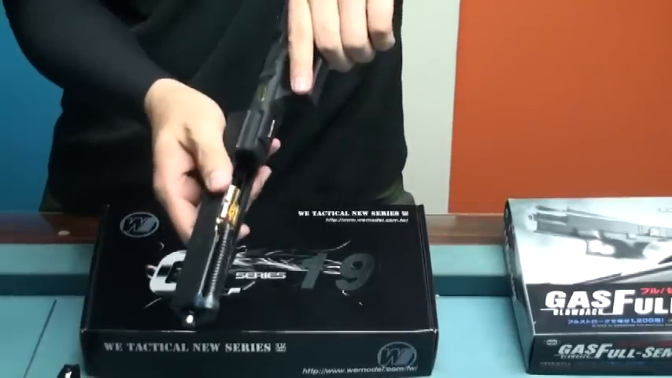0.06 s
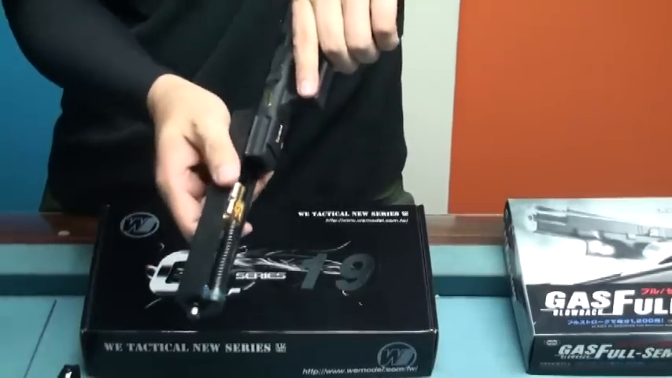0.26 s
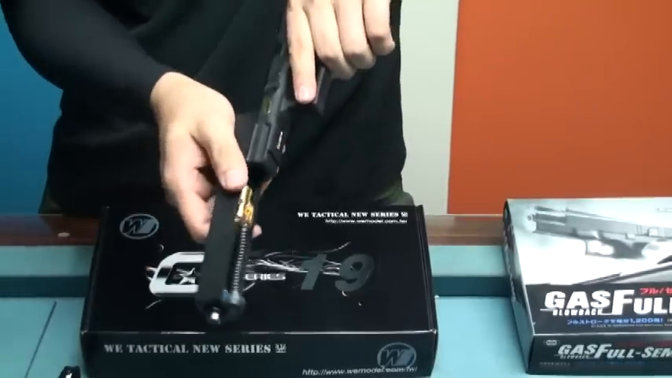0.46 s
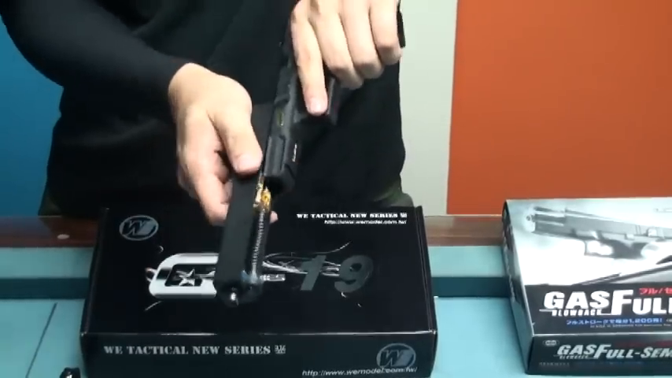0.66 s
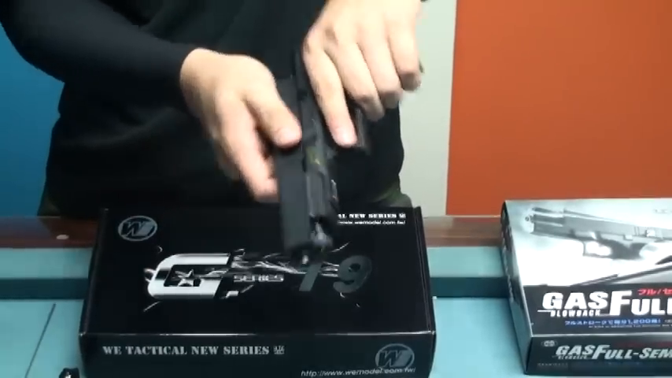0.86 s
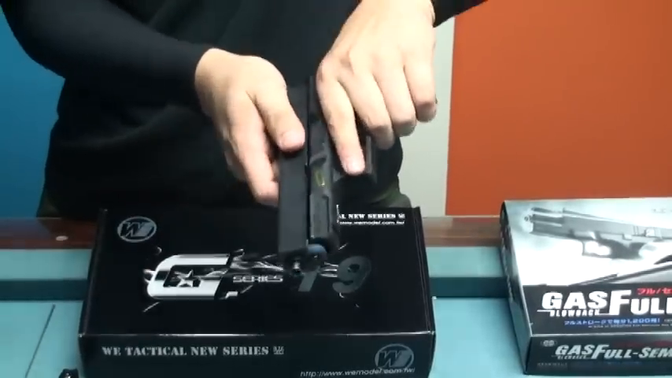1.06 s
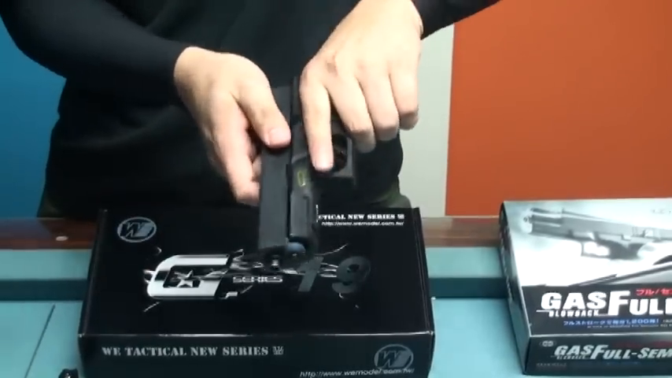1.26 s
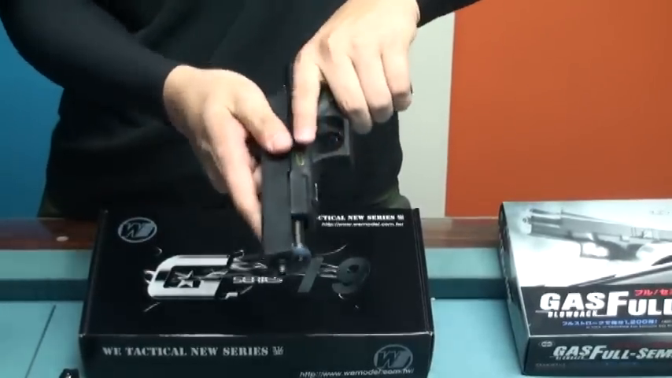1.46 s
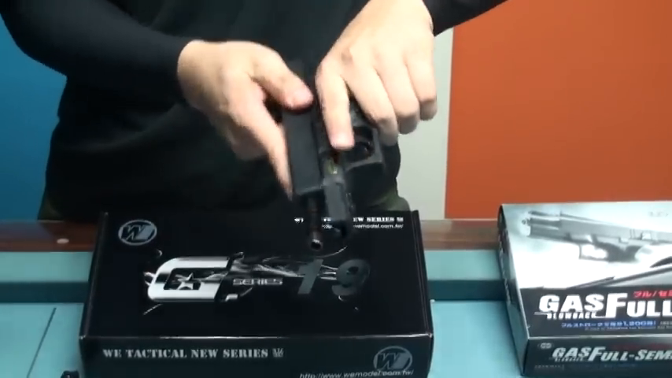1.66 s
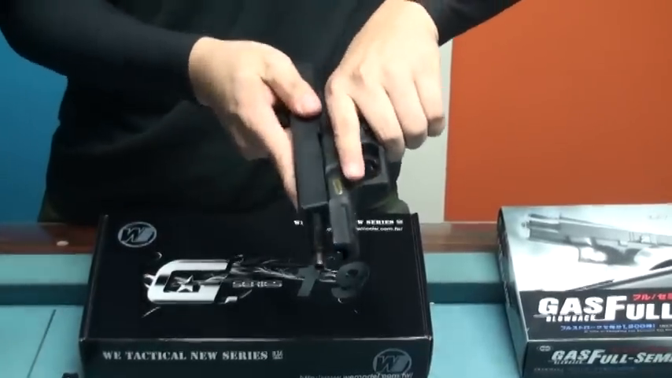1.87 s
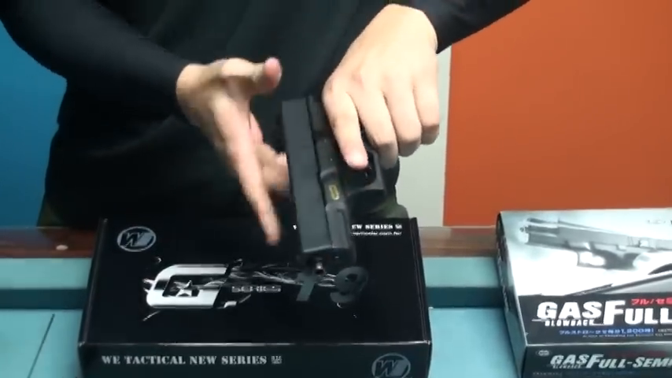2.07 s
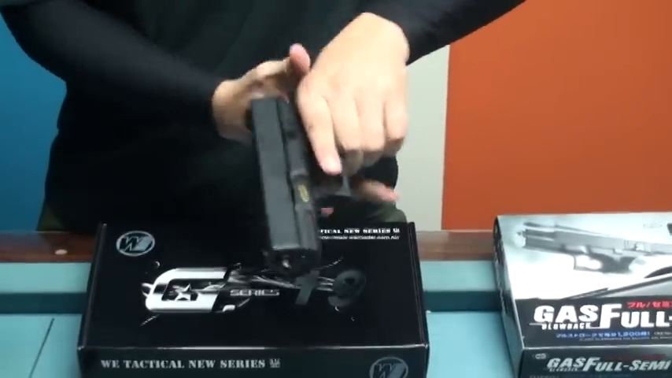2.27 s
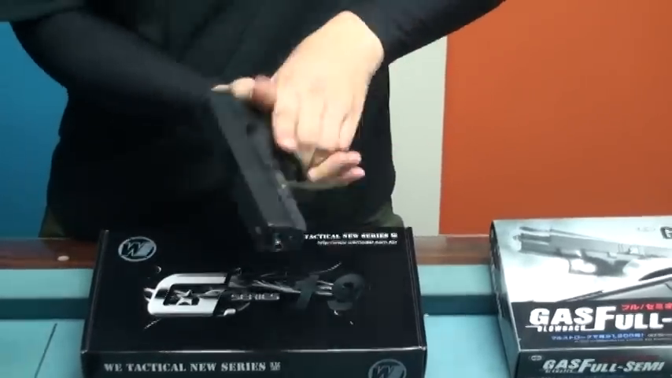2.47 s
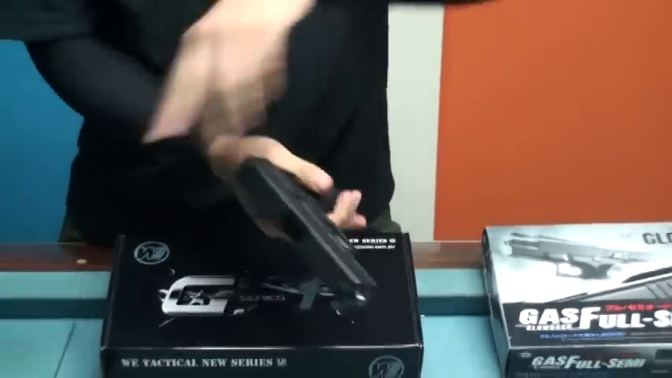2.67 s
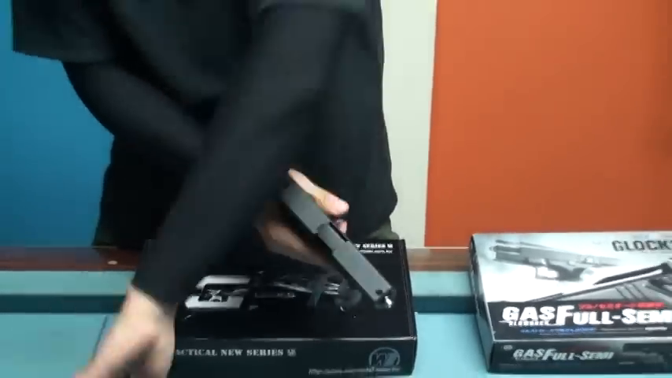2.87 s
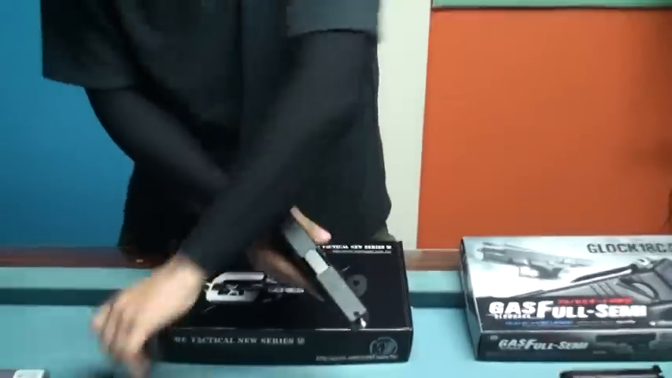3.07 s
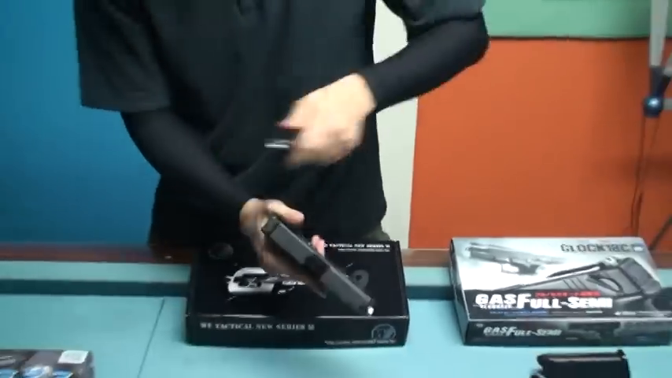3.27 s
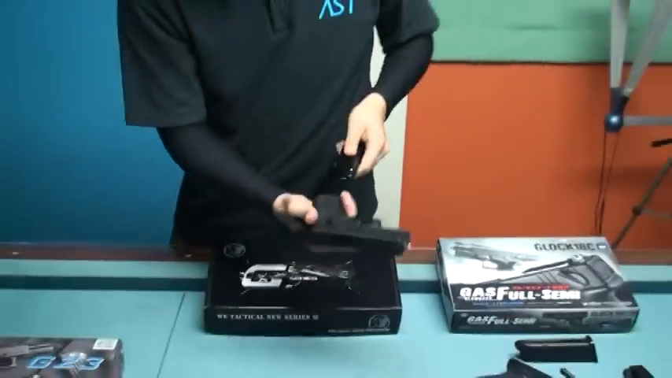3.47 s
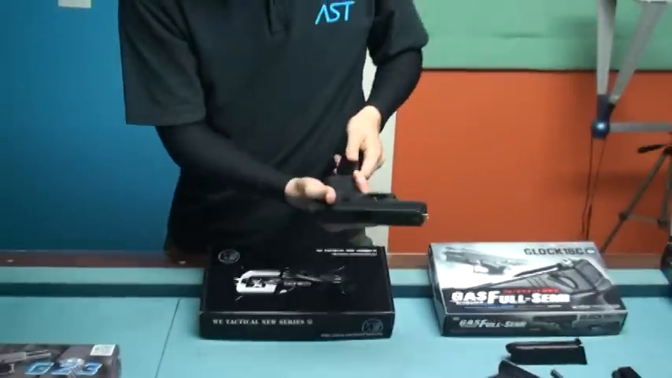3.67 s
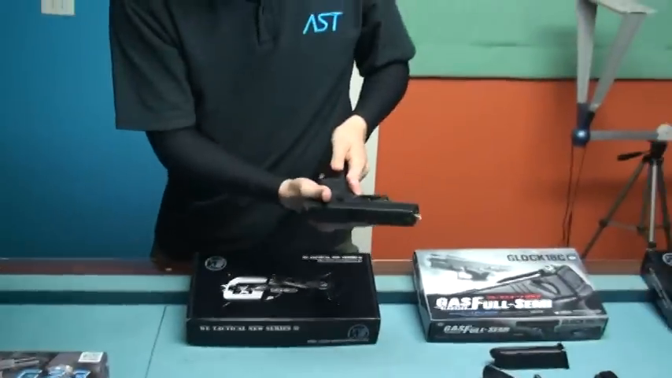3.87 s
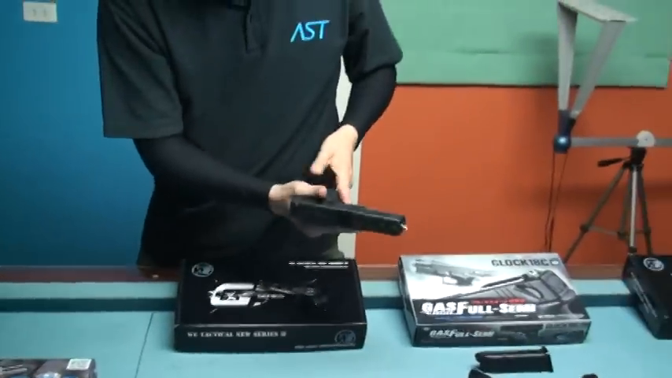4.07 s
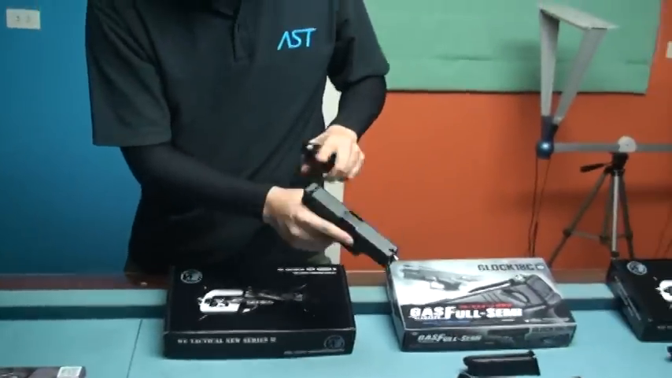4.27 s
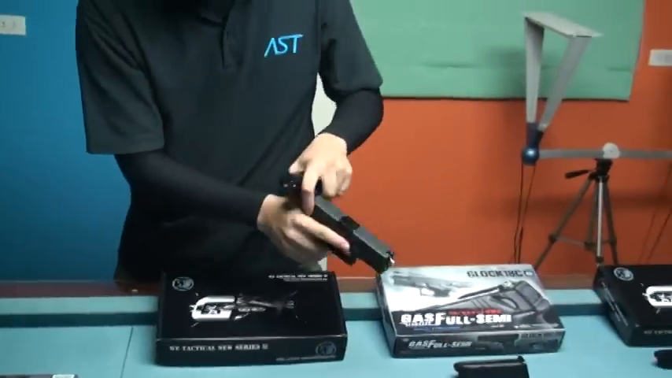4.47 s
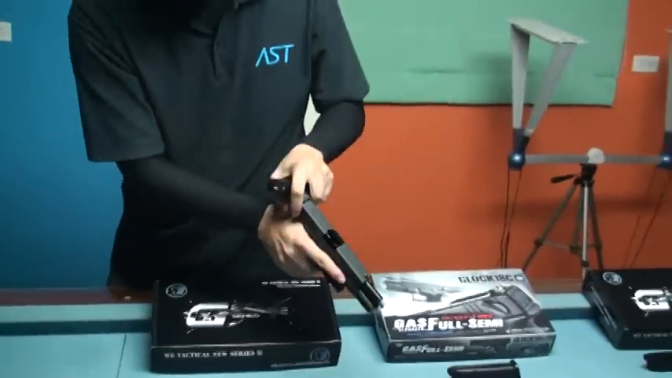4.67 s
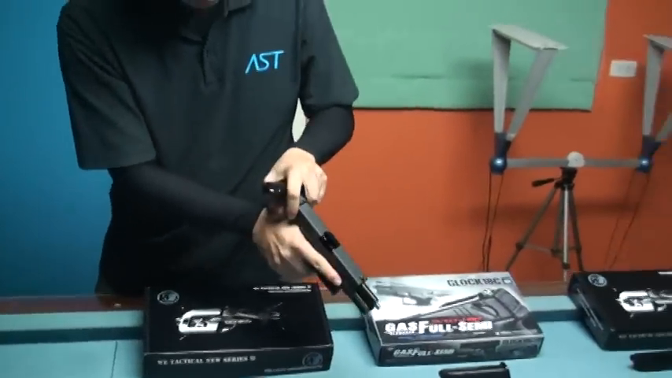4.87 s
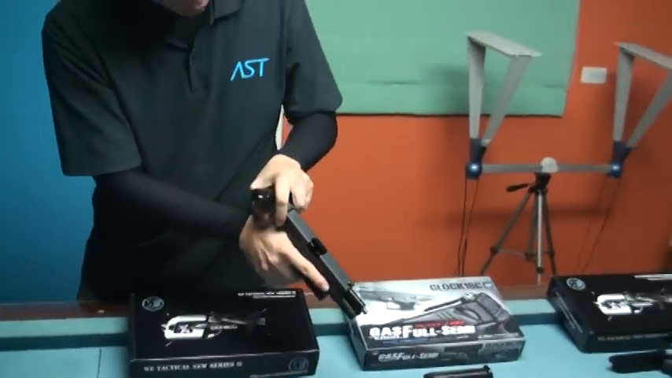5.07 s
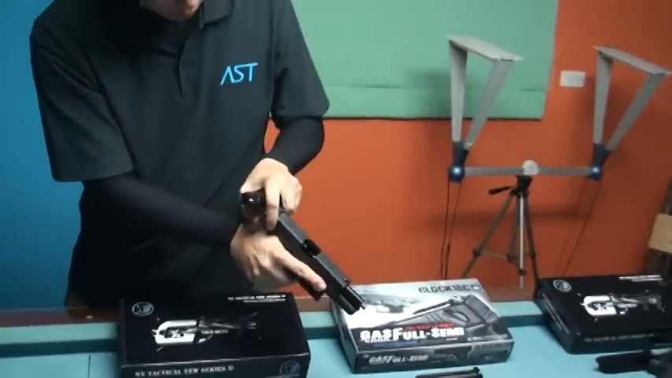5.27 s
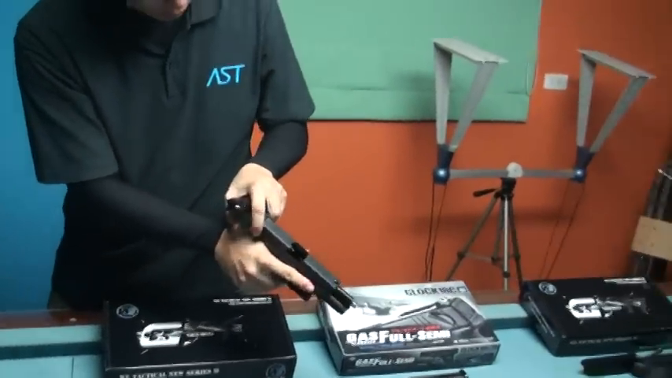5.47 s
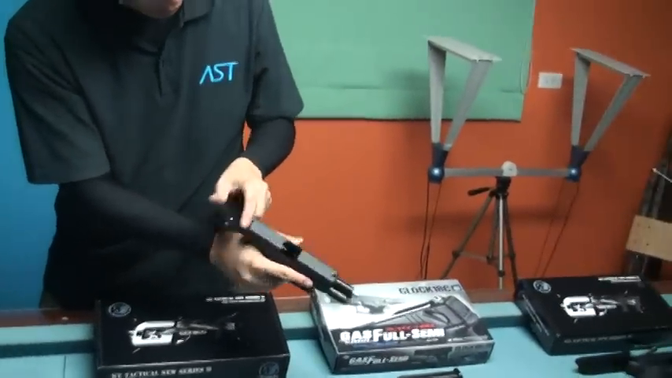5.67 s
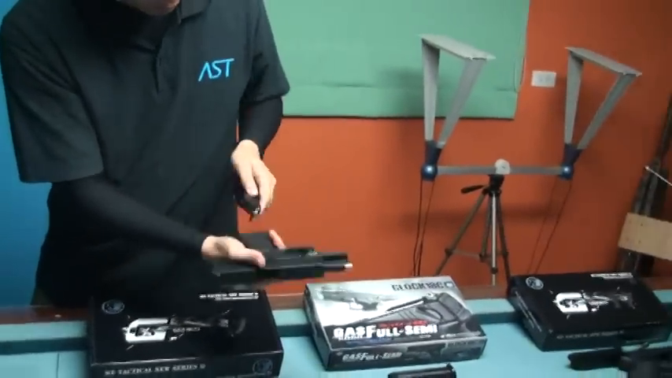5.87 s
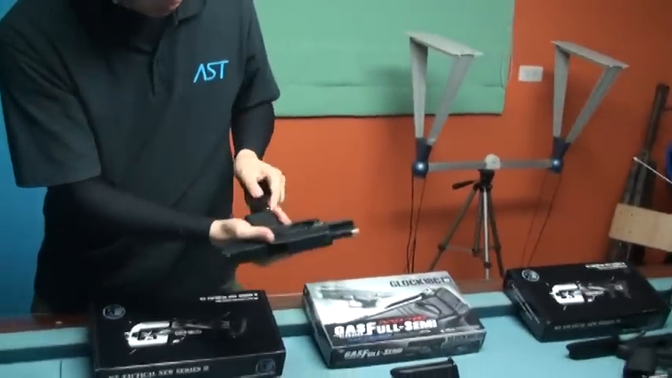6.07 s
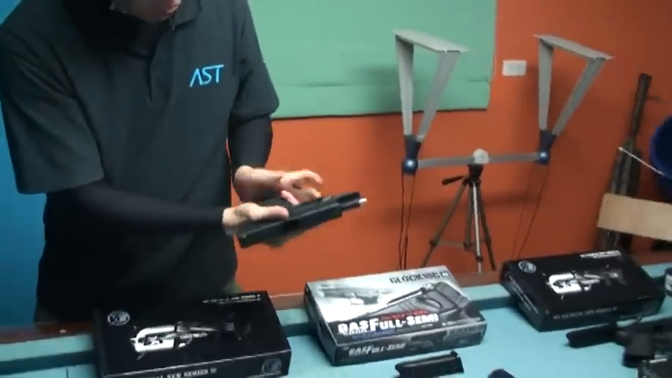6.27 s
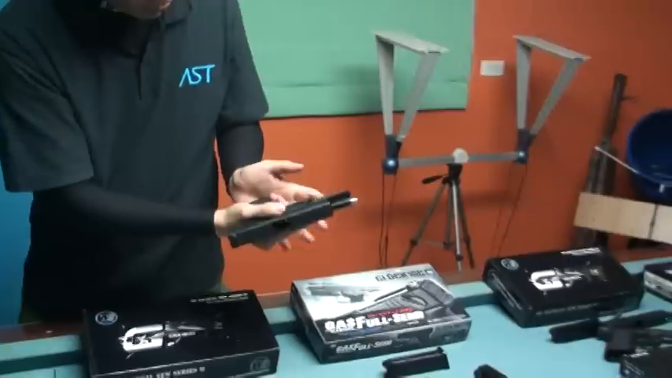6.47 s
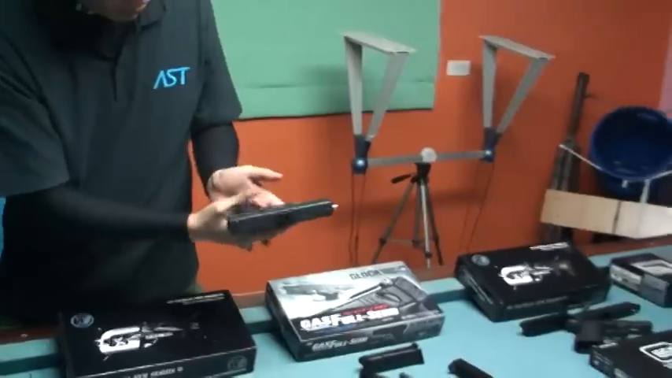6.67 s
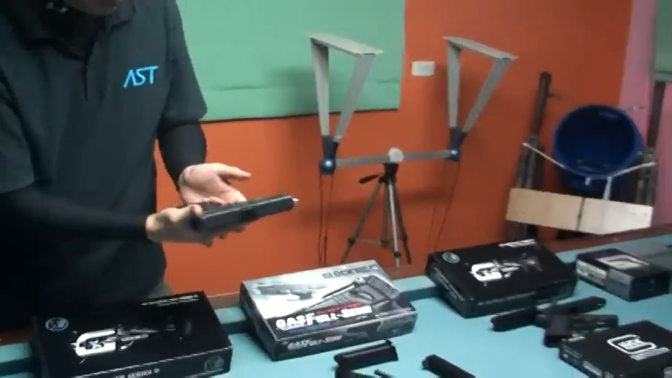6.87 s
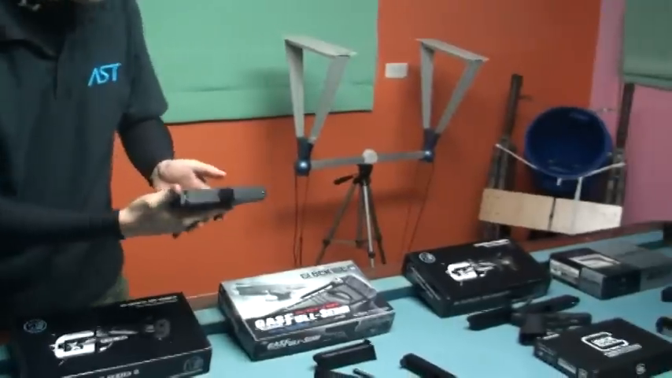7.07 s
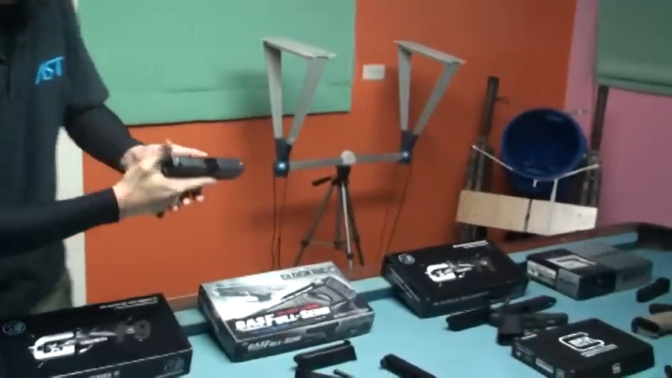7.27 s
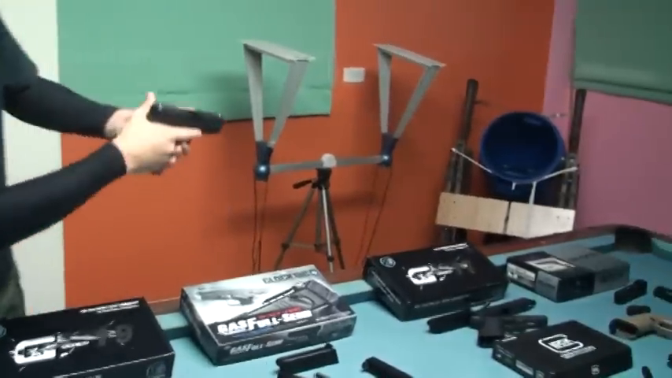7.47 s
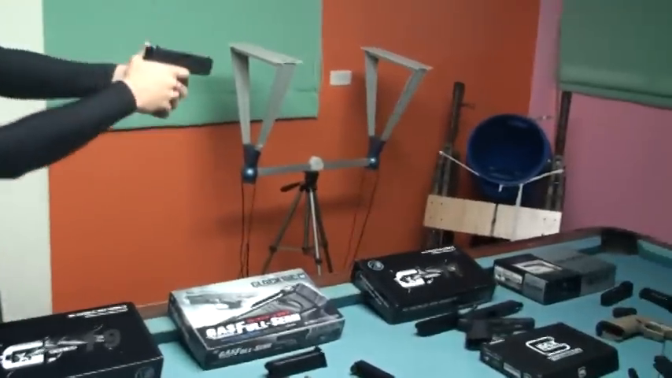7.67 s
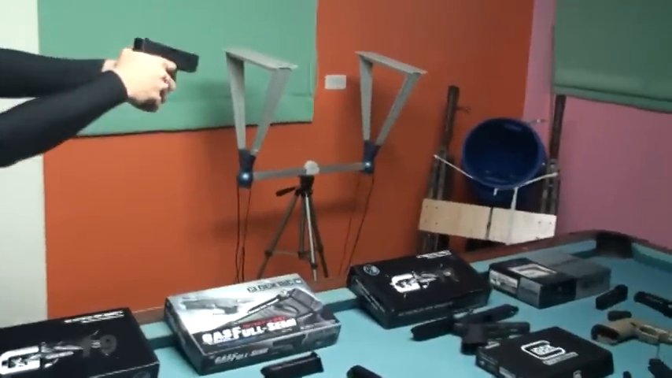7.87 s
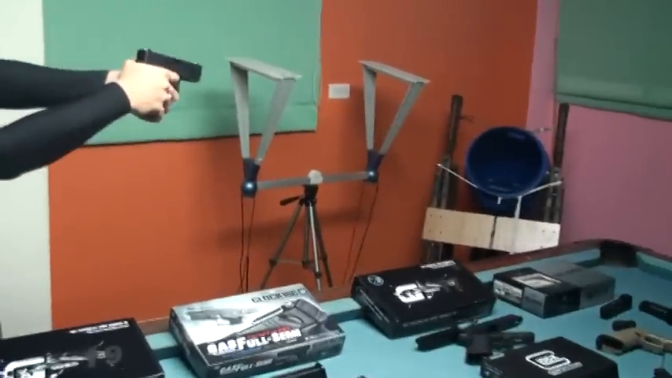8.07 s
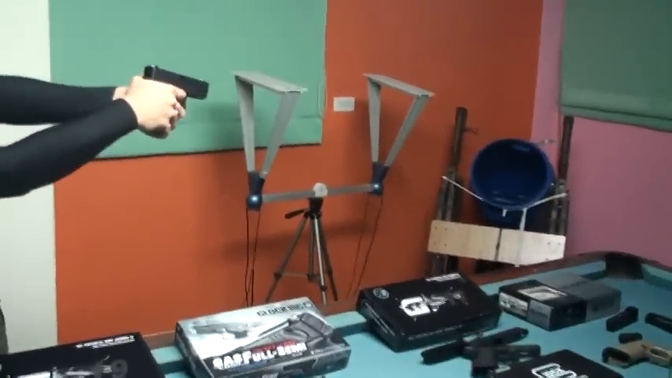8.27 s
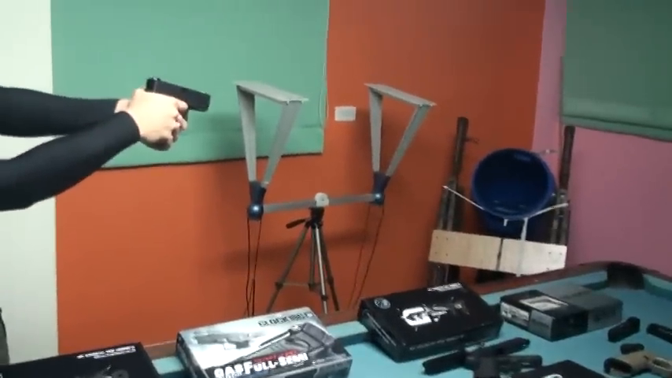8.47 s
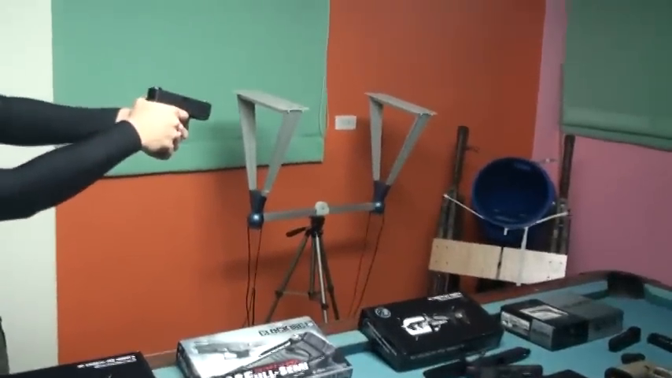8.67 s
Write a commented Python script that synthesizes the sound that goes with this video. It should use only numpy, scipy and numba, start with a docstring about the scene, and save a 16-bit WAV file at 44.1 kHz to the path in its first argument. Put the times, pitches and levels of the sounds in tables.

```python
"""A small, hard room: an airsoft pistol is put together close to two microphones and fired once.
The slide scrapes onto the frame, is racked and slams home, the magazine is pushed in, the slide is released,
the trigger clicks and one gas shot goes off. Blows are noise cracks through resonances, with dying steel modes;
scrapes are runs of tiny slips; gas is decaying noise. A ventilator hums in the room's air.
A fast limiter flattens the hard blows, so the room's answer seems to swell behind them."""
import sys
import numpy as np
from scipy import signal
from scipy.fft import rfft, irfft, next_fast_len
from scipy.io import wavfile
from numba import njit

SR = 44100
rng = np.random.default_rng(int(sys.argv[2]) if len(sys.argv) > 2 else 0)


def inscribe(sig):
    """Save sig as 16-bit PCM at rate SR to the path in sys.argv[1].

    A 1-D sig is mono; a 2-D sig holds one channel per row.
    Samples are clipped to [-1, 1] before scaling.
    """
    pcm = np.round(np.clip(np.atleast_2d(sig).T, -1, 1) * 32767)
    wavfile.write(sys.argv[1], SR, pcm.astype(np.int16))


N = 384984  # length [samples]

# The shot's valve, gas bursts and slide stops: (time [s], level [dB], decay t60 [s], low push [dB])
SHOT_BURSTS = [(8.398, -28, 0.074, -15), (8.403, -16, 0.038, -6), (8.411, 6, 0.21, -0.5),
               (8.439, 6.5, 0.086, -3.5)]
# Spectrum of the gas before the low push and the hollow resonances: (frequency [Hz], density [dB per Hz])
GAS_SPECTRUM = [(40, -52), (70, -40), (110, -4.5), (220, -6), (540, -5), (720, 5), (1200, 4.5), (1700, 1.5),
                (3000, 3), (7000, 0), (12000, 4), (16000, -12)]
# Hollow resonances stirred by the gas: (frequency [Hz], width [Hz], level [dB])
HOLLOW_PEAKS = [(395, 75, 11.5), (900, 41, 6)]
# The slide runs into its stop: (time [s], level [dB], brightness [dB], length of the run [s])
SLIDE_SLAMS = [(0.9951, -17, -12, 0.018), (1.6946, -12, -1, 0.012), (1.703, -8, -5.5, 0.01),
               (2.0643, -1, 0, 0.04), (6.6101, -0.5, -0.5, 0.022)]
# Resonances of the metal slide, before each blow's ring level: (frequency [Hz], width [Hz], level [dB])
SLIDE_PEAKS = [(2280, 250, -0.5), (4480, 370, 10.5), (6420, 450, 6.5), (7460, 170, 2), (9640, 400, 9.5),
               (11380, 170, 9.5), (12930, 300, 15.5)]
# Thin ring of barrel and spring, before each blow's steel level: (frequency [Hz], level [dB], t60 [s])
STEEL_MODES = [(2240, -6, 0.58), (4420, -6, 0.41), (4600, -5, .33), (6560, 2, .45), (6700, 0, 0.3),
               (7300, 2, 0.41), (9700, -12, .5), (11540, -3, 0.35), (12530, -10, .33)]
# Part meets part: (time [s], level [dB], pitch of the struck part [Hz], brightness [dB])
PART_CONTACTS = [(0.264, -47.5, 1480, -40), (0.545, -37, 1890, -12), (0.565, -45, 1310, -8),
                 (0.707, -21.5, 6770, -9), (0.727, -26.5, 2300, -20), (0.8653, -27, 3570, -13.5),
                 (0.925, -26, 1700, -21), (0.9421, -14, 1080, -6), (0.9638, -21, 7400, 11),
                 (1.384, -39.5, 4040, -1), (1.4469, -18, 7240, -2.5), (1.4609, -22.5, 4190, -1),
                 (1.4978, -24.5, 2480, -7), (1.5804, -30.5, 2000, -10.5), (1.618, -35, 7160, 10),
                 (1.6416, -22.5, 6980, 7.5), (1.651, -22.5, 6860, -5), (1.6806, -12.5, 1285, -9),
                 (1.7549, -14, 2440, -5), (2.0426, -20, 2330, -21.5), (2.046, -22, 3000, 0.5),
                 (2.052, -20, 7150, -2), (2.356, -45, 1980, -13), (2.447, -44.5, 2880, -13),
                 (2.546, -47, 2000, -10), (3.818, -38, 2100, -12), (4.464, -15, 3010, -6.5),
                 (4.468, -19.5, 1130, -15), (4.498, -15.5, 1740, -9), (4.585, -20, 3300, -5),
                 (4.603, -17, 2120, -25), (4.615, -26, 1090, -12), (4.628, -12.5, 4100, -7.5),
                 (5.352, -42, 2780, -10), (5.384, -34.5, 2280, -7.5), (5.532, -39.5, 2550, -12.5),
                 (5.788, -45, 1500, -29.5), (6.278, -26, 2950, -12.5), (6.289, -31, 4730, -5.5),
                 (6.323, -29, 2000, -16), (6.3592, -17.5, 1400, -8), (6.373, -12.5, 3530, -8),
                 (6.5688, -12, 3250, -1), (6.596, -17.5, 2140, 1), (7.162, -34, 2000, -12.5)]
# Parts pushed along each other by hand: (start [s], end [s], level [dB], brightness [dB])
HAND_SCRAPES = [(0.664, 0.758, -43, -8), (0.829, 0.857, -41.5, -10), (0.87, 0.942, -33.5, -5.5),
                (0.931, 0.984, -24, -6), (1.424, 1.455, -45, -15), (1.456, 1.502, -30.5, -9),
                (1.601, 1.695, -37.5, -23), (2.441, 2.645, -51, -3), (3.821, 3.881, -57.5, -17),
                (4.47, 4.507, -28, -18), (4.573, 4.651, -27, -3.5), (5.348, 5.476, -50.5, -12),
                (6.298, 6.367, -31.5, -12), (7.155, 7.176, -50, -13)]
# Resonances of the trigger's click: (frequency [Hz], width [Hz], level [dB])
TRIGGER_PEAKS = [(2700, 250, 13.7), (3800, 390, 6.9), (7600, 430, 8.5), (11000, 300, 5.3)]
# Dull, soft bumps: (time [s], level [dB])
SOFT_BUMPS = [(2.961, -43.5), (3.004, -45), (3.063, -51.5)]
# Decay of the room: (frequency [Hz], t60 [s])
ROOM_DECAY = [(150, 0.7), (1000, 0.47), (3000, 0.5), (7000, 0.49), (11000, 0.45), (16000, 0.29)]
# Colour of the room's answer: (frequency [Hz], gain [dB])
ROOM_TONE = [(300, 3.5), (1200, 2.5), (3000, 1), (7000, 2.5), (13000, 0.5)]
# Spectrum of the room's air noise: (frequency [Hz], density [dB per Hz])
AIR_SPECTRUM = [(15, -45), (25, -14.5), (64, -18.5), (108, -2), (137, -17), (166, -5.5), (200, -4),
                (242, -8), (344, -8), (818, -7), (1520, -10.5), (2280, -11.5), (2990, -15), (10400, -25.5),
                (16000, -31.5)]
# Background over time: (time [s], air level [dB], offset of the hum [dB])
BACKGROUND_LEVEL = [(0, -53, -0.5), (2.4, -51, 0.5), (4.1, -53, -1), (6.1, -52, -0.5), (6.6, -51, -10),
                    (8.3, -54, -8)]
# Ventilator lines, before the hum's offset over time: (frequency [Hz], level [dB])
HUM_LINES = [(100, -70.5), (119, -70.5), (167, -63.5), (241, -65.5), (470, -73), (839, -70.5)]
# Likeness of the two microphones for near sound, echo and air: (frequency [Hz], left-right likeness [0-1])
NEAR_LIKENESS = [(3000, 1), (6000, 0.63), (12000, 0.74)]
ROOM_LIKENESS = [(200, 0.46), (3000, 0.42), (8000, 0.42), (13000, 0.11)]
AIR_LIKENESS = [(100, 0.37), (400, 0.24), (2000, 0.43), (12000, 0.22)]
# Balance of the two microphones for the same three: (frequency [Hz], left minus right [dB])
NEAR_BALANCE = [(1000, -8), (3000, -5), (6500, -4.5), (8000, -8.5), (9500, 8.5), (11500, -1.5),
                (13000, -10.5), (15500, -3)]
ROOM_BALANCE = [(1000, -9.5), (3500, -5.5), (7000, -8.5), (9500, -4), (11000, 0), (12500, -21.5),
                (15500, -33)]
AIR_BALANCE = [(120, -12), (500, -2.5), (1200, 1), (8000, 0), (12000, -9)]

SLAM_BODY_DB, SLAM_RING_DB, SLAM_ROOM_DB, SLAM_HZ = -7, -0.5, -2.5, 4520  # the same for every slam
# Rubbing on the rails: level against its slam, swell as the spring speeds the slide, brightness
RUN_DB, RUN_SWELL_DB, RUN_BRIGHT_DB = -23.5, 12, -5
# The magazine is rammed home: time, level, pitch of its hollow shell
MAGAZINE_S, MAGAZINE_DB, MAGAZINE_HZ = 6.3803, -2, 1840
# The smaller and higher the part, the less body it has; at the middle pitch it has BODY_DB
BODY_DB, BODY_DB_PER_OCTAVE, MIDDLE_PART_HZ = -1, -4, 3000
CONTACT_RING_DB, RING_GROWS = -10.5, 0.3  # slide ring after a 0 dB contact; dB it gains per dB of force
CONTACT_ROOM_DB = -4  # share sent into the room
PUSH_SWELL_DB = 2  # a push grows firmer along its way
TRIGGER_S, TRIGGER_DB = 7.9535, -26
DRY_TICK_S, DRY_TICK_DB = 4.322, -32.5  # one tick close by, with almost no echo
GRIP_DB, GRIP_Q = 6, 46  # the grip leaves different minor resonances free at each blow
TOP_HZ = 15800  # nothing passes above this


def shot(size=16384, room_db=-1):
    """Gas bursts from valve and muzzle and the slide's stops: decaying noise through hollow resonances."""
    out = np.zeros((2, N))
    for s, db, t60, push_db in SHOT_BURSTS:
        low_push = [(600, push_db), (2500, 0.014)]
        pushed = [(hz, level + along(low_push, hz)) for hz, level in GAS_SPECTRUM]
        spectrum = resonant(pushed, HOLLOW_PEAKS)
        burst = amp(db) * struck(near(fade(size, t60), spectrum))
        add(out, s, burst)
        add(out, s, amp(room_db) * np.linalg.norm(burst) * echo(spectrum, size=2048))
    return out


def slams():
    """The slide rubs ever louder along its rails, hits its stop and rings."""
    out = np.zeros((2, N))
    for s, db, bright_db, run_s in SLIDE_SLAMS:
        run = rub(run_s, RUN_SWELL_DB, RUN_BRIGHT_DB)
        add(out, s - run_s, amp(db + RUN_DB) * run)
        hit = clack(SLAM_HZ, SLAM_BODY_DB, bright_db, SLAM_RING_DB, SLAM_ROOM_DB, part_db=3, steel_db=-31)
        add(out, s, amp(db) * hit)
    return out


def magazine():
    """The magazine seats in the grip with one hard, hollow clack."""
    out = np.zeros((2, N))
    seat = clack(MAGAZINE_HZ, body_db=-1.5, bright_db=-3.0, ring_db=-19, room_db=0, part_q=8.9, part_db=7)
    add(out, MAGAZINE_S, amp(MAGAZINE_DB) * seat)
    return out


def contacts():
    """Parts knock together in the hands; big ones sound low and full, small ones high and thin."""
    out = np.zeros((2, N))
    for s, db, part_hz, bright_db in PART_CONTACTS:
        body_db = BODY_DB + BODY_DB_PER_OCTAVE * np.log2(part_hz / MIDDLE_PART_HZ)
        ring_db = CONTACT_RING_DB + RING_GROWS * db
        add(out, s, amp(db) * clack(part_hz, body_db, bright_db, ring_db, CONTACT_ROOM_DB))
    return out


def scrapes():
    """The hands push parts along each other."""
    out = np.zeros((2, N))
    for start, end, db, bright_db in HAND_SCRAPES:
        add(out, start, amp(db) * rub(end - start, PUSH_SWELL_DB, bright_db))
    return out


def lone_clicks():
    """A dry tick close by, and the trigger's thin ringing click before the shot."""
    out = np.zeros((2, N))
    tick = blow(parts_spectrum(body_db=1.5, bright_db=-5.5), room_db=-28.5)
    add(out, DRY_TICK_S, amp(DRY_TICK_DB) * tick)
    click = blow(resonant(parts_spectrum(body_db=-1.5, bright_db=4), TRIGGER_PEAKS), room_db=-2)
    add(out, TRIGGER_S, amp(TRIGGER_DB) * click)
    return out


def bumps(size=8192):
    """Soft knocks stir only low resonances."""
    out = np.zeros((2, N))
    dull = [(50, -16), (110, -1), (250, 0.5), (470, -0.5), (750, -22), (2500, -30.0)]  # (Hz, dB)
    for s, db in SOFT_BUMPS:
        add(out, s, amp(db) * struck(near(fade(size, 0.22), dull)))
    return out


def clack(part_hz, body_db, bright_db, ring_db, room_db, size=16384, count=12,
          kin_db=7, part_q=14, part_db=8, steel_db=-32):
    """A blow coloured by the struck part and the slide; steel modes near the part's pitch ring on most."""
    minor = [(hz, hz / GRIP_Q, GRIP_DB) for hz in 1000 * 2 ** rng.uniform(0, 3.7, count)]
    part = [(part_hz, part_hz / part_q, part_db)]
    slide = [(hz, width, level + ring_db) for hz, width, level in SLIDE_PEAKS]
    sound = blow(resonant(parts_spectrum(body_db, bright_db), part + slide + minor), room_db)
    steel = np.zeros(size)
    for hz, level, t60 in STEEL_MODES:
        kinship = np.exp(-(np.log(hz / part_hz) / 0.063) ** 2)
        mode_db = level + kin_db * kinship + 2 * rng.standard_normal()
        steel += amp(mode_db) * mode(size, hz, t60)
    # the steel is stronger at the right microphone
    add(sound, 0, amp(steel_db + .5 * ring_db) * steel * amp([[-3], [2]]))
    return sound


def blow(spectrum, room_db, size=8192, tick_db=1, buzz_db=-17):
    """A sharp tick, a crack that the fingers damp at once and a brief buzz, with the room's answer."""
    tick = amp(tick_db) * fade(size, t60=0.0013)
    buzz = amp(buzz_db) * fade(size, t60=0.13)
    drive = tick + fade(size, t60=0.031) + buzz
    crack = struck(near(drive, spectrum))
    sound = amp(room_db) * np.linalg.norm(crack) * echo(spectrum)
    add(sound, 0, crack)
    return sound


def rub(length_s, swell_db, bright_db, slips_per_s=1000, room_db=-2.0):
    """Rubbing is a swelling run of tiny slips of uneven size, with the room's answer."""
    n = max(round(length_s * SR), 256)
    slips = (rng.random(n) < slips_per_s / SR) * amp(3.9 * rng.exponential(size=n).clip(0, 3))
    effort = amp(swell_db * np.linspace(-1, 0, n)) * signal.windows.tukey(n, .3)
    # each slip dies away over a steady floor of friction
    grip = (signal.fftconvolve(slips, fade(n, t60=0.014))[:n] + 0.2) * effort
    spectrum = parts_spectrum(body_db=0, bright_db=bright_db)
    stroke = unit(near(grip, spectrum))
    sound = amp(room_db) * reverberate(stroke, grip, spectrum)
    add(sound, 0, stroke)
    return sound


def parts_spectrum(body_db, bright_db):
    """Hand-sized parts radiate almost no bass: (Hz, dB) points."""
    body = [(60, body_db - 56.0), (300, body_db - 26.0), (720, body_db - 10.5),
            (1100, body_db - 3), (1700, body_db + 1)]
    middle = [(2500, 1), (5000, -1.97)]
    treble = [(7000, bright_db / 2), (8500, bright_db), (11500, bright_db + 0.5),
              (13500, bright_db - 13.5), (16000, bright_db - 15.5)]
    return body + middle + treble


def resonant(spectrum, peaks):
    """A spectrum with (Hz, width Hz, dB) resonances standing on it."""
    hz = np.geomspace(20, SR / 2, 900)
    power = 1 + sum(amp(db) ** 2 / (1 + (2 * (hz - centre) / width) ** 2) for centre, width, db in peaks)
    return np.transpose([hz, along(spectrum, hz) + 10 * np.log10(power)])


def mode(n, hz, t60):
    """One dying resonance, its pitch shifted a little by the grip."""
    shifted_hz = hz * (1 + rng.normal(0, .001))
    return np.sin(2 * np.pi * shifted_hz * np.arange(n) / SR) * fade(n, t60)


def near(drive, spectrum):
    """Sound straight from the parts: noise under a driving envelope, coloured by them."""
    return lean(colour(noise_pair(len(drive), NEAR_LIKENESS) * drive, spectrum), NEAR_BALANCE)


def echo(spectrum, build_s=0.0033, size=1024):
    """The room's answer to one blow of that spectrum, energy 1: it builds up, then dies by frequency."""
    hz, t, z = signal.stft(noise_pair(28672, ROOM_LIKENESS), SR, nperseg=size)
    balance = np.array([[.5], [-.5]]) * along(ROOM_BALANCE, hz)
    db = along(spectrum, hz) + along(ROOM_TONE, hz) + balance
    decay = amp(-60 * t / along(ROOM_DECAY, hz)[:, None])
    tail = signal.istft(z * amp(db)[..., None] * decay, SR, nperseg=size)[1]
    tail *= 1 - np.exp(-(np.arange(tail.shape[1]) / SR / build_s) ** 2)
    return tail / np.linalg.norm(tail)


def reverberate(direct, drive, spectrum):
    """The room's answer to a longer stroke, as strong as its direct sound."""
    stroke = drive * rng.standard_normal(len(drive))
    wet = signal.fftconvolve(stroke[None], echo(spectrum), axes=1)
    return wet * np.linalg.norm(direct) / np.linalg.norm(wet)


def ventilation():
    """Air noise and a few slightly unsteady hum lines; the hum sinks after about six seconds."""
    t = np.arange(N) / SR
    s, air_db, hum_db = np.transpose(BACKGROUND_LEVEL)
    air = unit(lean(colour(noise_pair(N, AIR_LIKENESS), AIR_SPECTRUM), AIR_BALANCE))
    air *= amp(np.interp(t, s, air_db))
    hum = np.zeros(N)
    for hz, db in HUM_LINES:
        wander = np.cumsum(rng.normal(0, 0.01107, N))  # phase [rad]
        hum += amp(db) * unit(np.sin(2 * np.pi * hz * t + wander))
    return air + lean([hum, hum], AIR_BALANCE) * amp(np.interp(t, s, hum_db))


def noise_pair(n, alike):
    """White noise at two microphones, partly shared."""
    turn = np.arccos(np.clip(along(alike, np.fft.rfftfreq(n, 1 / SR)), -1, 1)) / 2
    mid, side = irfft(rfft(rng.standard_normal((2, n))) * [np.cos(turn), np.sin(turn)], n)
    return np.array([mid + side, mid - side])


def lean(pair, side):
    """Tip each frequency towards one microphone."""
    return np.array([colour(x, [(hz, sign * db / 2) for hz, db in side]) for x, sign in zip(pair, (1, -1))])


def colour(x, spectrum):
    """Causal (minimum-phase) filter with the gain of (Hz, dB) points."""
    n = x.shape[-1]
    m = 2 * next_fast_len(n // 2 + 2048)
    cepstrum = irfft(np.log(amp(along(spectrum, np.fft.rfftfreq(m, 1 / SR)))))
    # fold the cepstrum onto positive times
    cepstrum[1:m // 2] *= 2
    cepstrum[m // 2 + 1:] = 0
    return irfft(rfft(x, m) * np.exp(rfft(cepstrum)), m)[..., :n]


def along(points, hz):
    """Read (Hz, value) points on a log frequency axis."""
    f, v = np.transpose(points)
    return np.interp(np.log(hz + 1), np.log(f + 1), v)


def fade(n, t60):
    """Exponential decay, 60 dB in t60 seconds."""
    return amp(-60 * np.arange(n) / SR / t60)


def struck(x):
    """Scale a blow to rms 1 over its first 6 ms."""
    head = round(.006 * SR)
    return x / np.sqrt(np.mean(x[:, :head] ** 2))


def unit(x):
    """Scale to rms 1."""
    return x / np.sqrt(np.mean(x ** 2) + 1e-20)


def amp(db):
    """Decibels to gain."""
    return 10 ** (np.asarray(db) / 20)


def add(track, s, sound):
    """Mix a sound in at time s."""
    part = track[:, round(s * SR):][:, :sound.shape[-1]]
    part += sound[..., :part.shape[-1]]


def scene():
    """The pistol and its echoes over the room's air."""
    pistol = shot() + slams() + magazine() + contacts() + scrapes() + lone_clicks() + bumps()
    return pistol + ventilation()


@njit
def follower(level, attack, release):
    """An envelope that rises fast and sinks more slowly; both times in samples."""
    out, held = np.zeros(len(level)), 0.
    for i in range(len(level)):
        held += (level[i] - held) / (attack if level[i] > held else release)
        out[i] = held
    return out


def record(dry, attack_s=0.0011, release_s=0.0073, ahead_s=0.00044, limit_db=-10.5):
    """A fast limiter that looks slightly ahead, soft clipping of what slips past it, and the band limit."""
    level = follower(np.abs(dry).max(0), attack_s * SR, release_s * SR)  # the louder microphone steers both
    level = np.interp(np.arange(N) + ahead_s * SR, np.arange(N), level)
    limited = dry / np.maximum(1, level / amp(limit_db))
    clipped = limited / (1 + (limited / .78) ** 4) ** (1 / 4)
    m = next_fast_len(N + SR // 2)
    passed = np.fft.rfftfreq(m, 1 / SR) < TOP_HZ
    return irfft(rfft(clipped, m) * passed, m)[:, :N]


dry = scene()
out = record(dry)
inscribe(out)
```